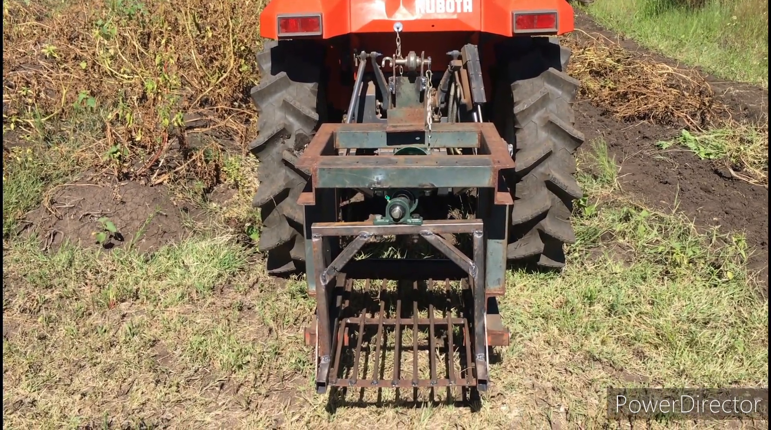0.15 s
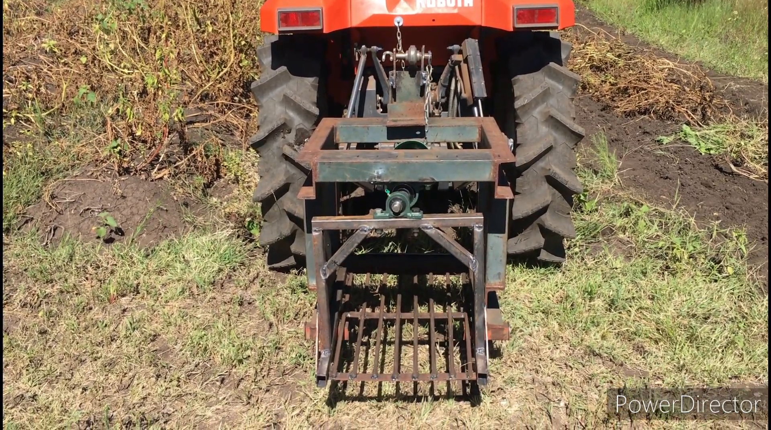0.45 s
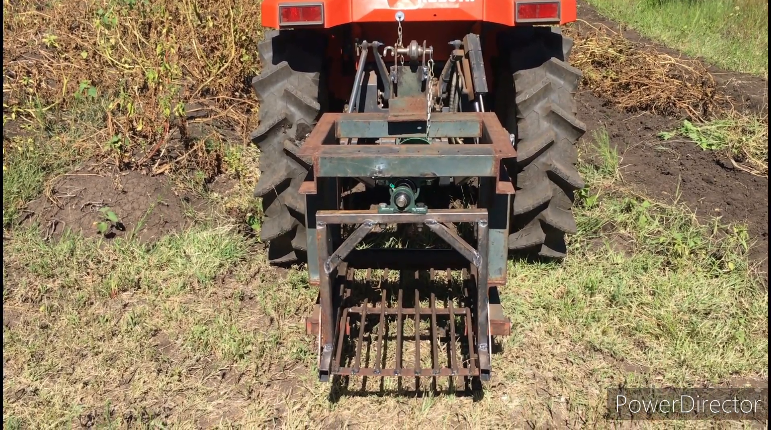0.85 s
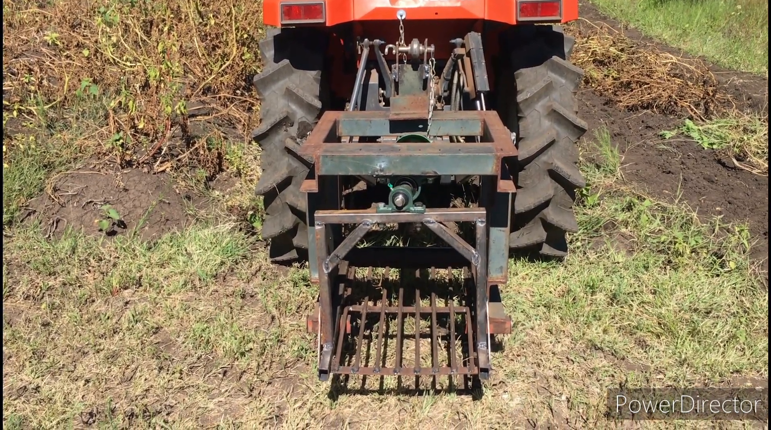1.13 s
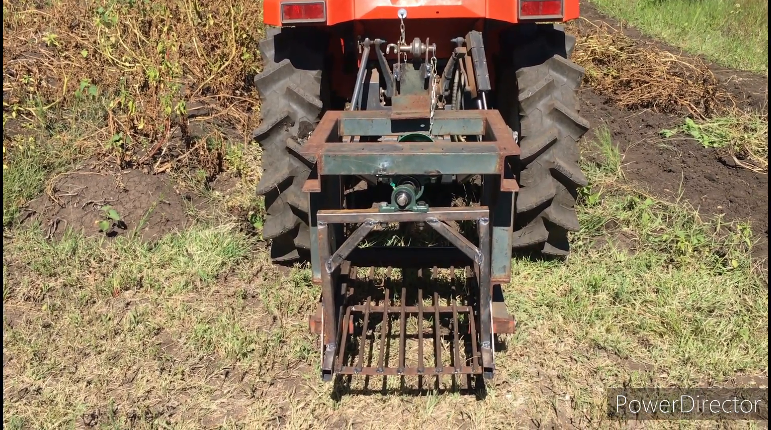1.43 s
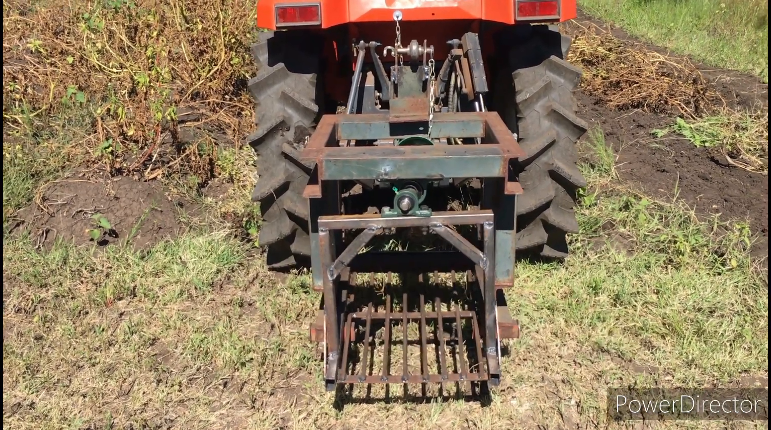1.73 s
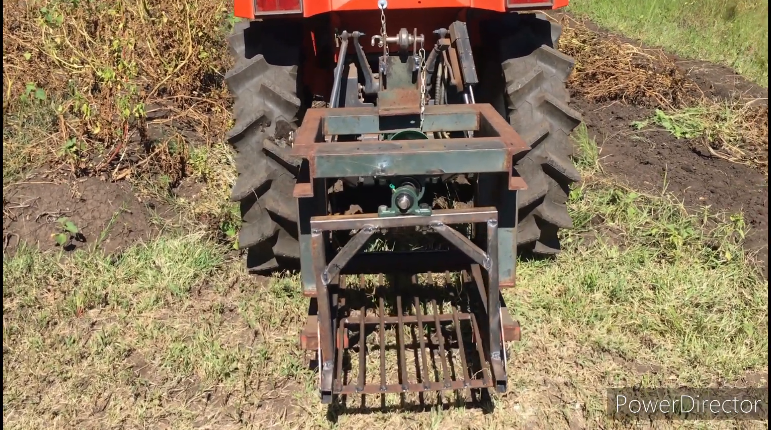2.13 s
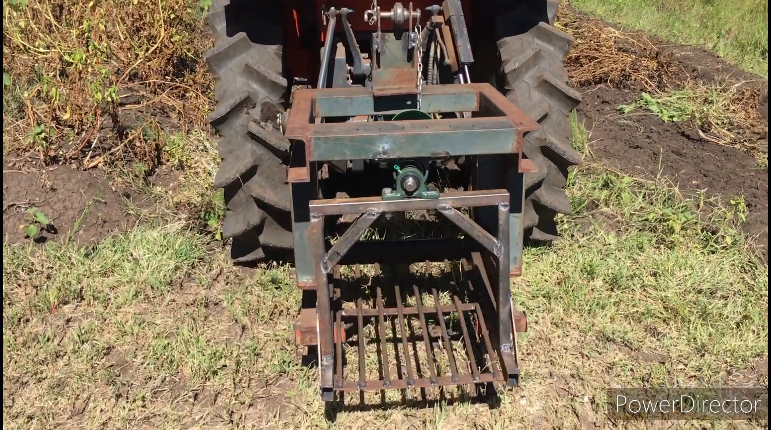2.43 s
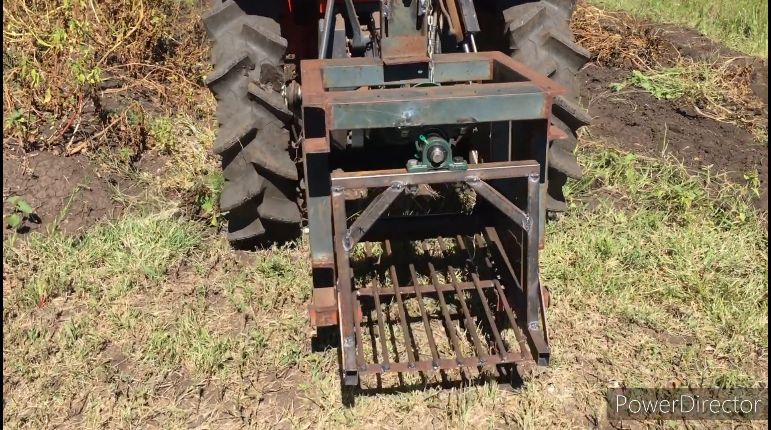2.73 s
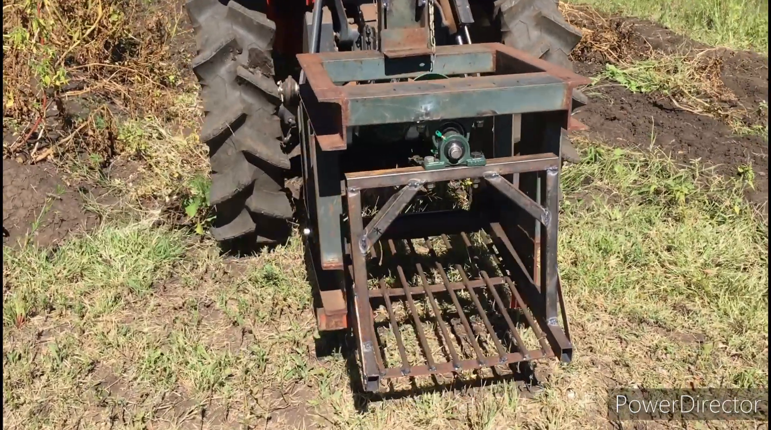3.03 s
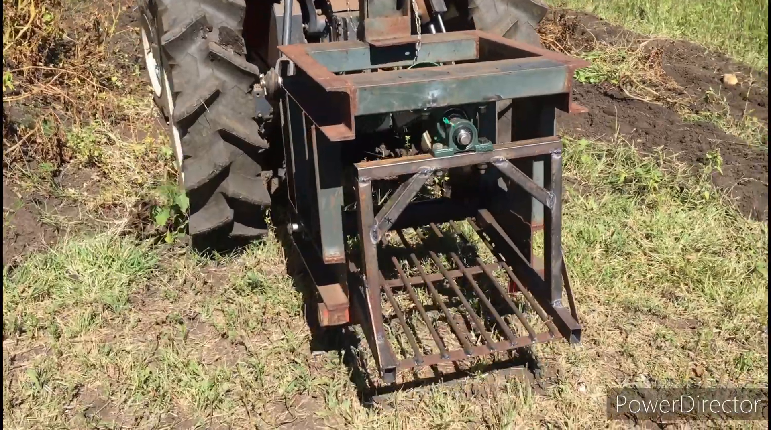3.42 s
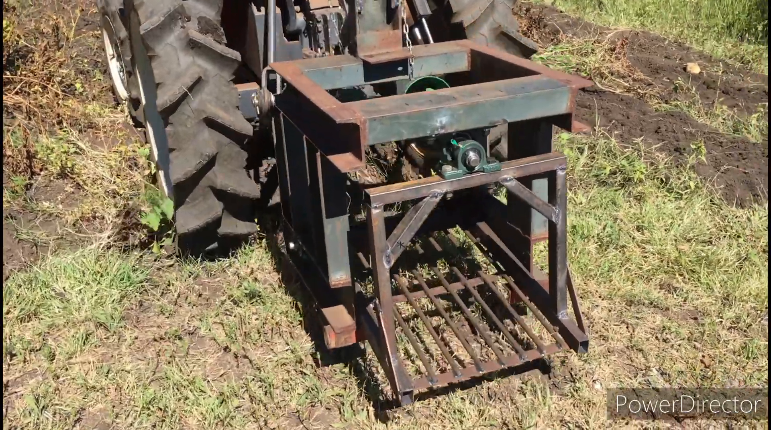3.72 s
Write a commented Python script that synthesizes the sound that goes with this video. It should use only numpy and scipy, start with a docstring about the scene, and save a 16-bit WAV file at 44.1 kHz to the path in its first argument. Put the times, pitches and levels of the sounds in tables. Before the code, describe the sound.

A digger's steel sieve clanks and rattles rapidly over a small diesel tractor idling outdoors. The clatter dies away, a few soft thuds sound close by, then the clanking returns louder and nearer.

```python
"""A small diesel tractor idles by a field, its exhaust a periodic pulse train of about 34 firings a second.
The digger behind it shakes a steel sieve about eight times a second: on each stroke a light knock and a
heavy clank excite the damped modes of its frame and bars. The clatter dies away, a few soft thuds pass,
and it returns louder as the sieve comes nearer. A faint hiss lies underneath."""
import sys
import numpy as np
from scipy import signal
from scipy.fft import rfft, irfft, next_fast_len
from scipy.io import wavfile
from scipy.ndimage import map_coordinates

SR = 44100
rng = np.random.default_rng(int(sys.argv[2]) if len(sys.argv) > 2 else 0)


def transcribe(u):
    """Save the signal u as a 16-bit wav file named by the first command-line argument.

    u: samples, shape (n,) or (channels, n), limited to [-1, 1]; the rate is SR.
    q: integer samples, one column per channel.
    """
    v = np.clip(np.atleast_2d(u).T, -1, 1)
    q = np.round(v * 32767).astype(np.int16)
    wavfile.write(sys.argv[1], SR, q)


N = 170667

FIRING_RATE = [(0.0, 33.3), (0.3, 33.43), (0.9, 34.23), (1.3, 34.34), (1.7, 34.3), (1.9, 34.31),
               (2.3, 34.04), (2.6, 33.25), (2.9, 33.56), (3.15, 32.89), (3.3, 35.96), (3.46, 36.56),
               (3.7, 36.02), (3.87, 35.0)]  # engine speed: time_s, rate_hz
EXHAUST_HARMONICS = [(1, -58.5), (2, -54), (3, -72.5), (4, -57.5), (5, -66), (6, -68), (7, -84), (8, -81.5)]  # multiples of the firing rate: order, level_db
BOOM_GAIN = [(0, 0.5), (.6, -0.5), (1.1, -1.5), (1.7, -1.5), (2.4, -1), (2.9, -1.5), (3.25, -2),
             (3.5, -7.5), (3.87, -3)]  # swell of the second harmonic: time_s, gain_db
RUMBLE_SPECTRUM = [(15, -23), (30, -15), (55, -1), (88, -2.5), (120, -2), (190, -1.5), (280, -9),
                   (420, -16.5), (800, -28.5), (2000, -63)]  # low engine noise: frequency_hz, gain_db
BLOCK_SPECTRUM = [(150, -27), (400, 5.5), (700, 4), (1100, -2), (1500, -1.5), (2200, -11), (4000, -17),
                  (9000, -40)]  # engine block clatter: frequency_hz, gain_db
CASING_MODES = [(842, -2, 0.035), (1076, 2, 0.049), (1369, -2, 0.055), (1740, -9.5, 0.071)]  # engine casing resonances: pitch_hz, gain_db, t60_s

CLANK_BLOWS = [(-.02, -44.5, -61), (.096, -47, -62), (0.227, -45.5, -62), (0.361, -49, -60.5),
               (0.49, -55.5, -70), (0.526, -53, -91), (0.656, -53.5, -78), (0.742, -57.5, -98),
               (2.614, -47, -63), (2.747, -43, -63), (2.876, -43, -57.5), (3.012, -42, -61),
               (3.141, -44, -63), (3.271, -39.5, -56.5), (3.393, -39, -60), (3.514, -38, -55.5),
               (3.635, -39.5, -51.5), (3.759, -41, -58.5)]  # heavy impacts ending a stroke: start_s, force_db, rasp_db
KNOCK_BLOWS = [(0.054, -51.5, -79, -67), (0.182, -48.5, -67, -73), (0.309, -51.5, -69, -72),
               (.457, -63, -74, -76), (1.290, -65, -68.5, -72), (2.700, -53, -83, -78),
               (2.838, -50.5, -65, -53.5), (2.971, -56, -77, -55), (3.105, -47.5, -66, -49),
               (3.235, -49.5, -63, -49.5), (3.358, -47.5, -64, -47), (3.478, -45, -63, -44),
               (3.6, -50, -81, -48), (3.722, -46.5, -63, -45), (3.847, -47, -72, -55)]  # light impacts on the back swing: start_s, force_db, rasp_db, link_db
RATTLE_FORCE = [(0, -61), (.35, -54), (.5, -59), (.8, -64), (.95, -75.5), (2.45, -72.5), (2.58, -57),
                (2.8, -53), (3.15, -53), (3.45, -57.5), (3.87, -49.5)]  # loose rattle between blows: time_s, force_db
FRAME_MODES = [(534, -4.5, 0.24), (599, -6, 0.45), (692, -13.5, 0.29), (793, -1, 0.14), (898, 3, 0.091),
               (1094, -3.5, 0.29), (1262, -10, 0.11), (1401, 1.5, 0.2), (1740, -5.5, 0.19),
               (1768, -4.5, 0.23), (1862, -1.5, 0.11), (2165, -3, 0.15), (2418, -6, 0.13),
               (2805, -9.5, 0.22)]  # steel frame and tine resonances: pitch_hz, gain_db, t60_s
BAR_MODES = [(2972, 3, 0.11), (3230, -3, 0.21), (3734, 4.5, 0.093), (3810, -2.5, 0.082), (4054, -2.5, 0.12),
             (4430, -11, 0.32), (4570, -4, 0.13), (4850, -6, 0.11), (6750, -12, .08), (11600, -18, .08)]  # high resonances of the bars: pitch_hz, gain_db, t60_s
LINK_MODES = [(2400, -5, .035), (2485, 0, .06), (2620, -2, .012), (2760, -8, .03)]  # drive link resonances: pitch_hz, gain_db, t60_s
STEEL_SPECTRUM = [(120, -33), (300, -16.5), (450, -8), (560, -1), (900, 0.5), (1350, 2), (1580, -3.5),
                  (1900, -0.5), (2400, -9.5), (3100, -16.5), (4200, -20), (8000, -54)]  # dense ring of the whole digger: frequency_hz, gain_db
CRACK_SPECTRUM = [(600, -24), (1300, -0.5), (1900, 1.5), (2500, -2.5), (3100, -12.5), (4500, -20.5),
                  (9000, -43)]  # first contact of a blow: frequency_hz, gain_db
RASP_SPECTRUM = [(1500, 8), (3000, -1), (3800, -5), (5000, -1), (6800, -4), (8000, -17.5), (12000, -26),
                 (15500, -40)]  # steel scraping on steel: frequency_hz, gain_db
DRUMMING_SPECTRUM = [(80, -26), (160, 5.5), (205, -2), (270, -5.5), (340, -14.5), (500, -15), (900, -50.5)]  # drumming of the shaken frame: frequency_hz, gain_db

THUD_PULSES = [(1.297, 245, -54, 0.019), (1.395, 85, -39.5, 0.023), (1.424, 160, -46.5, 0.045),
               (1.478, 109, -41.5, 0.032), (1.565, 77.4, -44, 0.037), (1.644, 79.3, -39.5, 0.04),
               (1.648, 330, -45.5, 0.013), (1.648, 1600, -53, 0.0033), (2.745, 98, -42.5, 0.033),
               (3.105, 122, -44, 0.017), (3.132, 78, -38.5, 0.029)]  # soft thuds close by: start_s, pitch_hz, level_db, length_s
SCUFF_BURSTS = [(1.534, -58, 0.038), (1.574, -55, 0.012), (1.646, -48.5, 0.0078), (1.662, -54.5, 0.021)]  # scuffs among the thuds: start_s, level_db, hold_s
SCUFF_SPECTRUM = [(120, 5), (350, 2), (700, -3.5), (1200, -10.5), (2000, -21), (4000, -43), (9000, -51)]  # dull friction noise: frequency_hz, gain_db
HISS_SPECTRUM = [(100, 1), (1500, 0), (3000, 1), (5000, -0.5), (7500, -2.5), (9600, -2.5), (10400, -8),
                 (11200, -4.5), (15500, -9)]  # steady background: frequency_hz, gain_db


def amp(db):
    """Amplitude grows tenfold for every 20 dB."""
    return 10 ** (np.asarray(db) / 20)


def unit(x):
    """Normalisation to an rms of 1."""
    return x / np.sqrt(np.mean(x ** 2) + 1e-20)


def clock():
    """Uniform sampling: the time of each sample in seconds."""
    return np.arange(N) / SR


def curve(rows):
    """Linear interpolation between (time_s, value) points."""
    return np.interp(clock(), *np.transpose(rows))


def wobble(rate_hz):
    """Smooth random modulation: a spline through rate_hz Gaussian knots a second."""
    return map_coordinates(rng.standard_normal(2048), [clock() * rate_hz], mode="wrap")


def filtered(x, response):
    """Linear filtering multiplies the spectrum by a frequency response."""
    size = next_fast_len(N + SR // 2)
    return irfft(rfft(x, size) * response(np.fft.rfftfreq(size, 1 / SR)), size)[:N]


def coloured(x, spectrum):
    """Spectral shaping by (frequency_hz, gain_db) points, at rms 1."""
    hz, db = np.transpose(spectrum)
    return unit(filtered(x, lambda f: amp(np.interp(np.log(f + 1), np.log(hz), db))))


def noise(spectrum):
    """Spectrally shaped Gaussian noise, at rms 1."""
    return coloured(rng.standard_normal(N), spectrum)


def chatter(rate_hz):
    """Shot noise: tiny contacts of equal size at random times, at rms 1."""
    return unit(np.sign(rng.standard_normal(N)) * (rng.random(N) < rate_hz / SR))


def blows(start_s, level_db, attack_s, hold_s, t60_s):
    """Impact envelopes rise, hold and decay exponentially; being incoherent, they add in power."""
    age = clock() - np.asarray(start_s)[:, None]
    rise = np.clip(age / attack_s, 0, 1)
    decay = np.exp(-np.log(1000) * np.maximum(age - hold_s, 0) / t60_s)
    return np.linalg.norm(rise * amp(np.asarray(level_db)[:, None]) * decay, axis=0)


def ring(force, modes):
    """Modal response: the force is convolved with damped sinusoids of unit total energy."""
    t = np.arange(SR // 2) / SR
    response = sum(amp(db) * np.exp(-np.log(1000) * t / t60) * np.sin(2 * np.pi * (hz * t + rng.random()))
                   for hz, db, t60 in modes)
    return signal.fftconvolve(force, response / np.linalg.norm(response))[:N]


def exhaust(phase, boom_lag_cycles=0.22):
    """A pulse train is a harmonic series; uneven firing makes the higher orders flutter more."""
    boom = amp(curve(BOOM_GAIN)) * np.exp(-2j * np.pi * boom_lag_cycles)
    out = np.zeros(N)
    for order, db in EXHAUST_HARMONICS:
        depth = 0.04 + 0.025 * (order - 1)
        flutter = 1 + depth * (wobble(22.17) + 1j * wobble(22.24))
        harmonic = np.sqrt(2) * amp(db) * flutter * np.exp(1j * order * phase)
        out += np.real(harmonic * boom if order == 2 else harmonic)
    return out


def engine(first_firing_s=0.0117, block_lag_cycles=0.61):
    """The firing cycle drives the exhaust and amplitude-modulates the rumble, block and casing."""
    phase = 2 * np.pi * (np.cumsum(curve(FIRING_RATE)) / SR - first_firing_s * FIRING_RATE[0][1])
    throb = exhaust(phase)
    rumble = amp(-59) * unit(noise(RUMBLE_SPECTRUM) * (1 + 0.05 * np.cos(phase)))
    swing = amp(2.5 * np.cos(phase - 2 * np.pi * block_lag_cycles))
    block = amp(-74) * swing * noise(BLOCK_SPECTRUM)
    casing = amp(-74.5) * ring(swing * chatter(4000), CASING_MODES)
    return throb + rumble + block + casing


def sieve(rebound_s=0.033, rebound_db=-12.5):
    """Impact excitation: each blow is a crack, then chattering contacts that rasp and ring the steel."""
    clank_s, clank_db, clank_rasp_db = np.transpose(CLANK_BLOWS)
    knock_s, knock_db, knock_rasp_db, link_db = np.transpose(KNOCK_BLOWS)
    rattle = amp(curve(RATTLE_FORCE) + 1.74 * wobble(60))
    clanks = blows(clank_s, clank_db, attack_s=0.0039, hold_s=0.014, t60_s=0.17)
    # The sieve falls back once after each clank.
    rebounds = blows(clank_s + rebound_s, clank_db + rebound_db, attack_s=0.0017, hold_s=0.012, t60_s=0.23)
    knocks = blows(knock_s, knock_db, attack_s=0.0013, hold_s=0.017, t60_s=0.2)
    force = np.linalg.norm([clanks, rebounds, knocks, rattle], axis=0)
    scrape = np.hypot(blows(clank_s, clank_rasp_db, attack_s=0.0013, hold_s=0.01, t60_s=0.23),
                      blows(knock_s, knock_rasp_db, attack_s=0.0022, hold_s=0.016, t60_s=0.13))
    jerk = np.hypot(blows(knock_s, link_db - 1, attack_s=0.0016, hold_s=0.0069, t60_s=0.024),
                    blows(clank_s, clank_rasp_db + 1, attack_s=0.00069, hold_s=0.0036, t60_s=0.03))
    strike = blows(np.r_[clank_s, knock_s], np.r_[clank_db, knock_db],
                   attack_s=0.001, hold_s=0.007, t60_s=0.04)

    steel = amp(-5) * force * coloured(chatter(5000), STEEL_SPECTRUM)
    frame = amp(-8.5) * ring(force * chatter(6000), FRAME_MODES)
    rasp = scrape * coloured(chatter(2500), RASP_SPECTRUM)
    bars = amp(-7) * ring(scrape * chatter(4000), BAR_MODES)
    link = ring(jerk * chatter(6000), LINK_MODES)
    crack = amp(-7.5) * strike * coloured(chatter(4000), CRACK_SPECTRUM)
    drumming = amp(-6) * rattle * noise(DRUMMING_SPECTRUM)
    body = brightened(steel + frame + crack, force, edge_hz=1620, neutral_db=-46.5, slope=0.2)
    friction = brightened(rasp + bars, scrape, edge_hz=8500, neutral_db=-64, slope=0.79)
    return body + friction + link + drumming


def brightened(x, force, edge_hz, neutral_db, slope):
    """Harder contacts have wider spectra: the treble gains slope dB for each dB of force."""
    treble = filtered(x, lambda f: f ** 6 / (f ** 6 + edge_hz ** 6))
    gain = (force / amp(neutral_db) + 1e-9) ** slope
    return x + treble * (gain - 1)


def thuds():
    """Heavily damped impacts, like steps on soft soil, give brief dull pulses; some scuff as well."""
    t, pulses = clock(), np.zeros(N)
    for start_s, pitch_hz, level_db, length_s in THUD_PULSES:
        age = 2 * np.maximum(t - start_s, 0) / length_s  # 1 at the peak
        envelope = age ** 2 * np.exp(1 - age ** 2)
        pulses += amp(level_db) * envelope * np.sin(2 * np.pi * pitch_hz * (t - start_s))
    scuff_s, scuff_db, hold_s = np.transpose(SCUFF_BURSTS)
    scuffs = blows(scuff_s, scuff_db, attack_s=0.0016, hold_s=hold_s[:, None], t60_s=0.035)
    return pulses + scuffs * noise(SCUFF_SPECTRUM)


def hiss():
    """Stationary broadband noise forms a faint floor."""
    return amp(-72) * noise(HISS_SPECTRUM)


def scene():
    """Superposition: in the open air the sources add without reverberation."""
    return (engine() + sieve() + thuds() + hiss())[None]


def record(dry):
    """Band limiting: an ideal low-pass filter removes the highest treble."""
    return filtered(dry[0], lambda hz: hz < 15680)[None]


dry = scene()
out = record(dry)
transcribe(out)
```